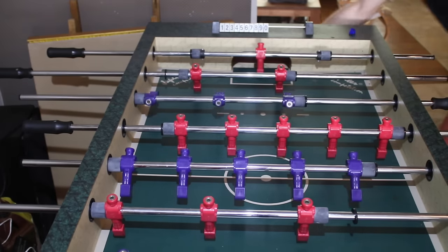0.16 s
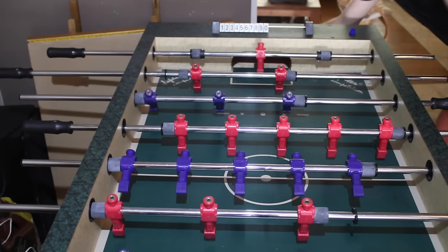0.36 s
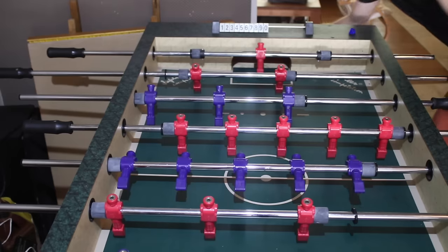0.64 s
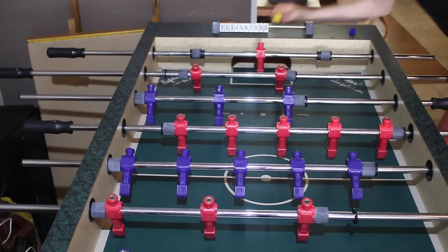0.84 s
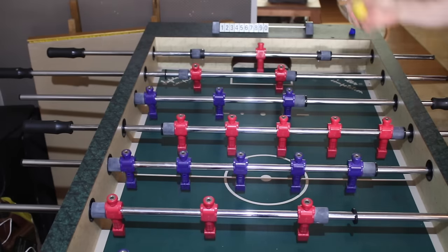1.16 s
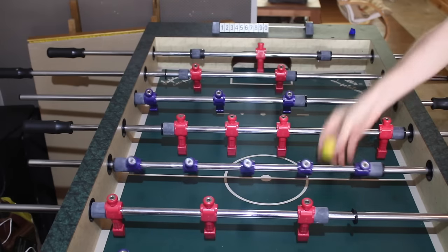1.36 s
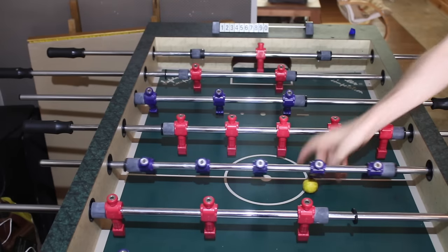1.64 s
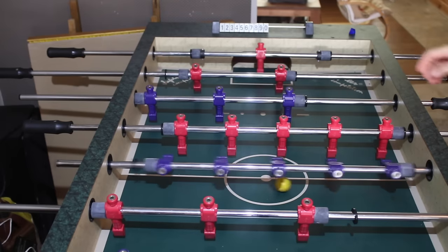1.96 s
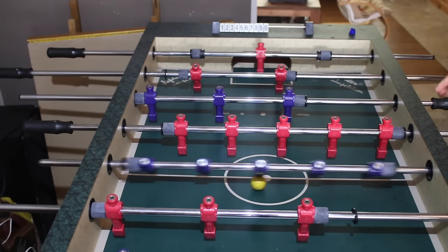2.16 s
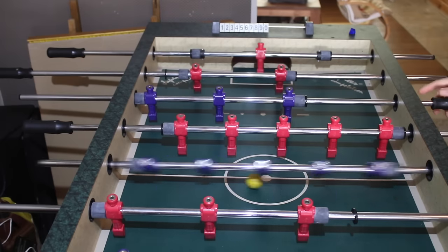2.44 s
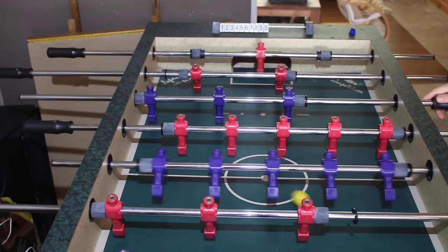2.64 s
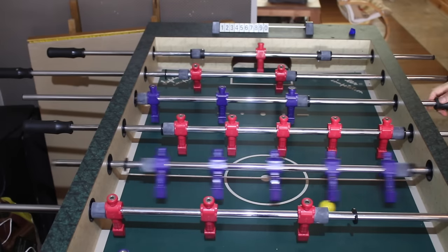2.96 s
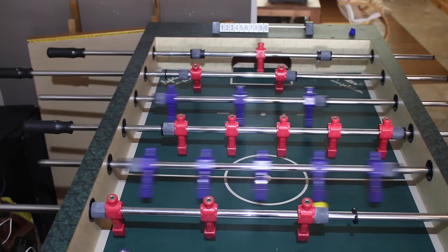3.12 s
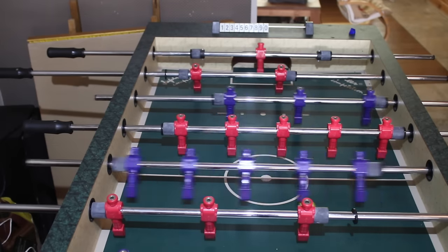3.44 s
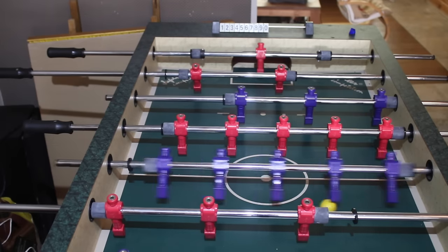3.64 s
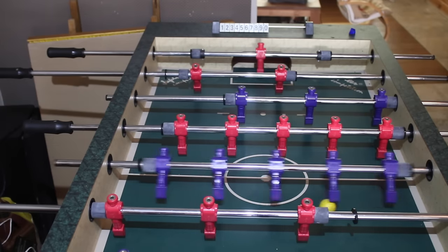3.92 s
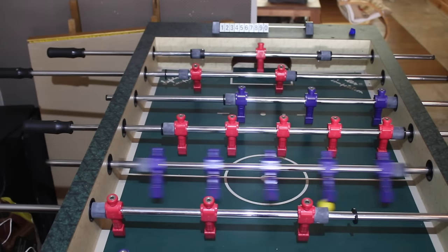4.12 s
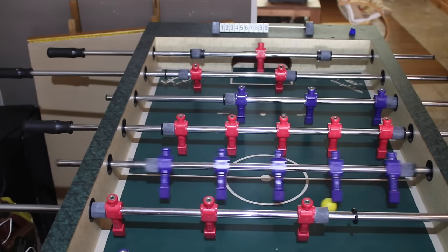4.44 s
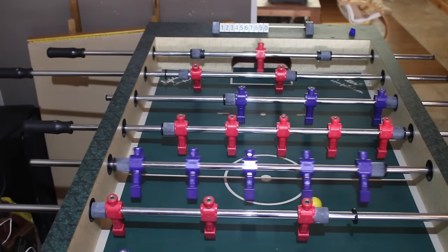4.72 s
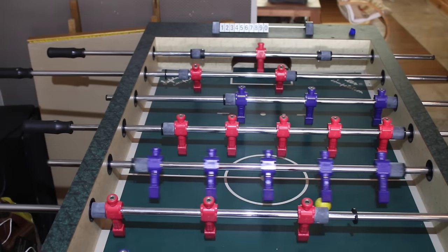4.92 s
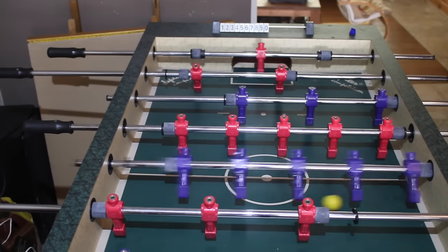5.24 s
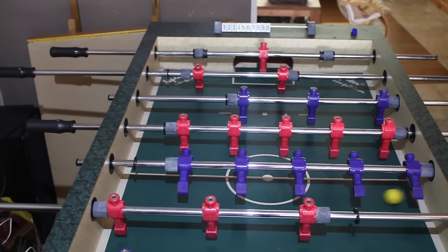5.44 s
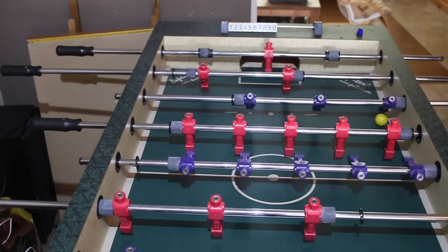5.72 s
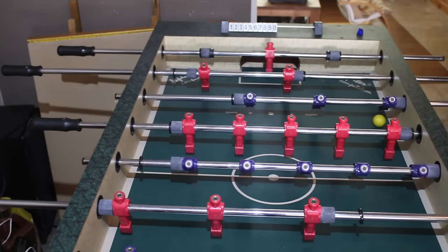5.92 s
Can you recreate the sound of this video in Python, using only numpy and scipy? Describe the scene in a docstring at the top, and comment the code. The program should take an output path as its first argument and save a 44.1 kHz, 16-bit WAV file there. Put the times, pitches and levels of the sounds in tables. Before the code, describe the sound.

Table football up close: hollow booming knocks, a rolling ball, rods clacking and scraping in their bearings, ending with a flurry of hard kicks.

```python
"""A table football ball, close by: it knocks in the return tray, drops on the field and rolls; figures kick it.
Each blow rings the modes of the hollow table, and rolling drives the same modes so the table booms underneath.
Steel rods scrape through their bearings and clack as filtered noise; there is a brief squeak and a thin ring.
The place is a small hard room, with a stereo microphone at one end of the table: noise echoes, still air."""
import sys
import numpy as np
from scipy import signal
from scipy.fft import rfft, irfft
from scipy.io import wavfile
from scipy.ndimage import uniform_filter1d

SR = 44100
rng = np.random.default_rng(int(sys.argv[2]) if len(sys.argv) > 2 else 0)


def unload_audio(sound):
    """Save the sound as a 16-bit wav file, at the path given as the first command line argument."""
    columns = np.transpose(np.atleast_2d(sound))
    # keep every value between -1 and 1, then stretch to whole-number steps
    steps = np.round(np.clip(columns, -1, 1) * 32767)
    wavfile.write(sys.argv[1], SR, steps.astype(np.int16))


N = 268128
T = np.arange(N) / SR  # seconds
FALL = np.log(1000)  # a decay of 60 dB, for t60 times

# Knocks of ball and figures against field and walls; the soft ones from 2.607 to 2.796 s are swells
# of the rolling. Each row: start in seconds, dry peak in dB, hardness in dB per octave,
# ring factor on every t60 (at least 0.1), boom below 200 Hz in dB.
KNOCKS = [(1.554, -26.5, 0, 2.1, 0), (1.611, -14, 2.5, 2.6, -20), (1.627, -13, 0, 1.8, -20),
          (1.649, -3.5, 3, 0.55, 6), (1.66, -6, -2, 1.15, 0), (1.731, -13.5, -9, 1.2, 4),
          (1.857, -25.5, -3, 1.1, -4), (2.016, -19.5, -9, 0.55, -2), (2.151, -21.5, -5, 0.94, 0),
          (2.251, 0, 3, 0.43, 6.5), (2.262, -7.5, 4.5, 0.4, 9), (2.274, -7.5, -16.5, 1.96, -10),
          (2.411, -1.5, -0.5, 0.47, 6.5), (2.421, -7, 4, 0.56, 0), (2.433, -19, -30, 1.1, -14),
          (2.498, -13.5, -22, 0.57, -11), (2.552, -16, -18, 0.73, -13), (2.607, -12, 1.5, 1.2, -8),
          (2.702, -26, -11, 0.44, -36), (2.796, -12, -1, 0.34, -23), (2.8615, 0, 6.5, 0.61, 12.5),
          (2.937, -32, -16, 0.39, -14), (3.286, -24.5, 2, 2.5, -10), (3.32, -19, -18, 0.64, 4),
          (3.64, -37, -6, 0.42, 16), (3.757, -21, 5, 0.51, -2), (4.319, -29, -5, 1.9, -8),
          (4.644, -27, -1, 0.71, -5), (3.545, -32, -10, 0.65, 20), (3.737, -9, -2.5, 1.6, 1),
          (5.2515, -3, 3.5, 0.43, 12.5), (5.261, -4.5, -3, 0.29, 7), (5.308, -8.5, -20, 0.91, -23),
          (5.412, -14, -10, 0.97, 10), (5.488, -9, 0, 0.082, 11), (5.6145, 0, 3, 0.27, -31),
          (5.7155, -8, 11.5, 1.6, -22), (5.85, -13.5, 9, 0.51, -25), (5.897, -13.5, -8, 0.13, -10)]
# Ball in the return tray. Each row: the same columns as KNOCKS.
TRAY_KNOCKS = [(0.1635, -18.5, -0.5, 1.07, -9), (0.265, -25.5, 9, 0.58, -7), (0.344, -22.5, 0.5, 1.16, -10),
               (0.651, -5.5, 4, 0.44, -12), (0.661, -6, 4.5, 0.5, -13)]
# Modes of the hollow table. Each row: frequency in Hz, relative level in dB, t60 in seconds.
TABLE_MODES = [(70.9, -20.5, 0.72), (83, -2.5, 0.042), (133.1, -0.5, 0.081), (192.2, -5, 0.2),
               (223.8, -1, 0.18), (251.2, 0.5, 0.17), (287.6, -6.5, 0.24), (315.4, -2.5, 0.3),
               (358.4, 0, 0.26), (389.1, -5, 0.24), (438, 5, 0.037), (507.6, 0, 0.033), (553, -9.5, 0.11),
               (737, 0.5, 0.0083), (777, -19.5, 0.084), (929, -25, 0.19), (950, -15, 0.18),
               (1006, -7.5, 0.044), (1160, -6, 0.031), (1298.5, -15.5, 0.13), (1439, -17.5, 0.11),
               (1590, -21.5, 0.048), (2325, -18.5, 0.038), (2670, -32, 0.064), (3430, -26, 0.016),
               (3800, -42.5, 0.028)]
# Modes of the return tray. Each row: frequency in Hz, relative level in dB, t60 in seconds.
TRAY_MODES = [(196.7, -9, 0.96), (346, 2.5, 0.18), (410, -5.5, 0.019), (466.7, 0, 0.63), (638, -5, 0.16),
              (750, -6.5, 0.18), (782, -7, 0.16), (1190, -15, 0.057), (1502, -14.5, 0.091)]
# Moments the tray is touched, in seconds; its ring then dies quickly.
TOUCH_S = [.262, .505]
TOUCH_T60_S = .05
SCATTER_DB = 2.2  # every blow finds the modes a little differently
PHASE_SPREAD = .22  # in units of pi radians: the modes of a blow start nearly together

# Ball ticking against a figure. Each row: contact in seconds, dry peak in dB.
TICKS = [(2.571, -19), (3.255, -35), (3.332, -32), (3.353, -21), (3.361, -22), (3.379, -30), (5.445, -29),
         (5.524, -17)]
# Modes of a plastic figure. Each row: frequency in Hz, relative level in dB, t60 in seconds.
FIGURE_MODES = [(2210, -5.5, 0.13), (2380, -8, .045), (2760, -2, 0.05)]

# Ball rolling and rods shaking the table. Each row: time in seconds, level in dB,
# low boom relative to it in dB, dry whirr of the field board relative to it in dB,
# tilt of the body modes in dB per octave.
ROLL = [(0, -35.5, -13, -7, 1), (.13, -52.5, 1, -17, -10), (.9, -57.5, -7, -11, -3), (1.3, -64.5, -5, 4, 4),
        (1.42, -38, -29, -22.5, -9), (1.58, -43, -28, -4.5, 18), (1.76, -24.5, -4, -11.5, -16),
        (1.82, -31.5, -9, -17, -6), (1.98, -29.5, -9, -11, 4), (2.08, -27, -24, -18, 2.5),
        (2.23, -33, -16, -15.5, 1), (2.33, -22, -12, -16, -7), (2.5, -19, -9.5, -23, -18),
        (2.6, -30.5, 4.5, -6, -4), (2.66, -26, -9, -9.5, 4), (2.74, -23, -7, -13.5, 11),
        (2.84, -24.5, -17, -14, 2.5), (2.97, -19, 3, -12.5, -10.5), (3.06, -27.5, -13, -18, -26),
        (3.18, -39, 2.5, -7.5, 8.5), (3.32, -29, -7, -8, 0), (3.45, -38, 3.5, -3.5, 9),
        (3.7, -32.5, 0, -7, 8), (3.8, -28, -3, -13.5, -13), (3.92, -34.5, -7, -7, -2),
        (4.3, -35.5, -1, -7.5, 4.5), (4.64, -35, -1.5, -8, -0.5), (4.87, -44.5, -8, -5.5, 5),
        (5.08, -42.5, -7, -4.5, 3), (5.22, -29, -16, -13, 3), (5.33, -24, -10, -14, -18),
        (5.45, -24, -6, -3, 11), (5.59, -15.5, -15.5, -22.5, -8), (5.622, -57, -54, -22, -6),
        (5.635, -13.5, -45, -34, 12), (5.66, -15, -34, -29, 1), (5.675, -20, -35, -26, -3),
        (5.76, -28, -25, 0, 11), (5.87, -22, -14.5, -8.5, -1), (5.93, -35, -4, -13, -4.5),
        (6.08, -44.5, -4, -3.5, 4)]
FOCUS_DB = 6  # per octave squared: the rolling ball favours the body modes near its spot

# Rods jolting in their bearings. Each row: contact in seconds, dry peak in dB,
# brightness in dB per octave, t60 at 4 kHz in seconds.
CLACKS = [(1.087, -41, 6, 0.27), (1.098, -36, 2.5, 0.3), (1.554, -29.5, -2.5, 0.22),
          (1.658, -26.5, 8, 0.15), (1.831, -26.5, 33, 0.3), (1.84, -24, 2, 0.24), (1.936, -12.5, 5, 0.17),
          (2.2556, -20, 4.5, 0.1), (2.326, -21.5, -0.5, 0.16), (2.413, -19, -0.5, 0.14),
          (2.569, -17, -0.5, 0.25), (2.749, -35.5, 42, 0.12), (2.865, -26, 35, 0.23),
          (3.058, -28, -3, 0.21), (3.279, -14.5, 3, 0.35), (3.284, -12.5, 4.5, 0.096),
          (2.963, -24, -12, 0.21), (3.447, -23, -1.5, 0.2), (3.5694, -12.5, 3, 0.2),
          (3.7628, -20.5, 1.5, 0.22), (3.863, -9, 4, 0.17), (4.052, -30.5, 2.5, 0.47),
          (4.1554, -11.5, 2.5, 0.2), (4.347, -34.5, 16, 0.98), (4.441, -14.5, 3.5, 0.26),
          (4.7433, -10.5, 4, 0.16), (5.0657, -39.5, -3.5, 0.34), (5.126, -42.5, 15, 1),
          (5.171, -28.5, -3, 0.18), (5.215, -21, 0.5, .1), (5.225, -15, 5.5, 0.085), (5.3535, -3, 7.5, 0.1),
          (5.3876, -26, 14, 0.37), (5.4231, -16.5, -1, 0.42), (5.524, -18, -5.5, 0.15),
          (5.6159, -6, -4.5, 0.11), (5.717, -3, -8, 0.033), (5.888, -22.5, -1, 0.42),
          (5.94, -30.5, 5.5, 0.098)]
# Resonances of rod, bearing and figures. Each row: frequency in Hz, width in Hz, level in dB.
ROD = [(806, 98, 9), (1310, 202, 13), (2314, 810, 11), (2843, 170, 6), (3100, 1840, 2.5), (3970, 130, 4.5),
       (4800, 650, 3), (6000, 5400, -7.5), (6960, 2000, 0.5), (9130, 3400, -4), (10900, 9600, -13.5)]
# Rods pushed through their bearings. Each row: middle in seconds, length in seconds,
# scrape level in dB, hiss relative to the scrape in dB.
STROKES = [(1.524, 0.26, -60, 6.5), (1.96, 0.29, -44.5, -3), (2.445, 0.45, -39, -10),
           (3.164, 0.79, -49.5, -6.5), (3.447, 0.27, -48.5, -20), (3.71, 0.74, -56, 7),
           (3.928, 0.17, -42.5, -9), (4.32, 0.44, -48.5, -7), (4.647, 0.2, -48.5, -4),
           (5.467, 0.34, -32, -12.5), (5.823, 0.35, -30.5, -18)]
REST_DB = -78  # faint rubbing that never stops
# Thin high hiss as the rod runs up to its stop: middles in seconds.
SWISH_S = [3.235, 3.52, 3.82, 4.105, 4.39, 4.695]
SWISH_HZ, SWISH_DB, SWISH_LEN_S = 13700, -53, .13

# Rough, staggered partials of a brief squeak. Each row: frequency in Hz, tone peak in dB,
# middle in seconds, length in seconds.
SQUEAK = [(2560, -54, 0.54, 0.05), (1535, -51.5, 0.55, .07), (1280, -46, .55, 0.05),
          (990, -42, .585, 0.091), (3080, -53, 0.586, 0.12), (1950, -64, 0.43, 0.063)]
SQUEAK_HISS_START_S, SQUEAK_HISS_LEN_S = 0.523, 0.11
# Thin high ring that starts at once and fades. Each row: start in seconds, tone level in dB, t60 in seconds.
RING = [(5.453, -50, 0.77), (5.89, -50, 0.34)]
RING_HZ = 13410

# Room echoes. Each row: frequency in Hz, t60 in seconds, echo level in dB.
ROOM = [(165, 0.54, -7.5), (460, 0.28, -4.5), (1460, 0.42, -6.5), (4350, 0.45, -10), (8900, 0.33, -9)]
# Spectrum of still room and microphone hiss. Each row: frequency in Hz, relative density in dB.
AIR = [(18, -30), (30, 3.5), (133, -12.5), (256, 4), (622, -10.5), (996, -18), (2020, -16), (6210, -23.5),
       (6720, -25.5), (15500, -30.5)]
AIR_DB = -51  # overall level
TOP_HZ = 15750  # top of what the microphone passes


def knocks(events, modes, contact_s, rustle_db, rustle_t60, scatter_db, touches=()):
    """A blow rings the panel modes afresh, building up over the contact time, with a rustle of small modes."""
    out, t = np.zeros(N), T[:SR // 3]
    hz, db, t60 = np.transpose(modes)[:, :, None]
    for s, peak_db, hard, ring, boom_db in events:
        ring = max(ring, .1)
        level_luck, pitch_luck, phase_luck = rng.standard_normal((3, len(modes), 1))
        hardness_db = hard * np.log2(np.maximum(hz, 220) / 300)
        gain = undb(db + hardness_db + boom_db * (hz < 200) + scatter_db * level_luck)
        phase = 2 * np.pi * hz * (1 + 0.0052 * pitch_luck) * t + PHASE_SPREAD * np.pi * phase_luck
        ringing = gain * np.exp(-FALL * t / (t60 * ring)) * np.sin(phase)
        body = ringing.sum(axis=0) * (1 - np.exp(-(t / contact_s) ** 2))
        body += rustle(t, hz[:, 0], db[:, 0], hard, rustle_db, rustle_t60 * ring)
        for touch_s in touches:
            if touch_s > s:
                body = body * np.exp(-FALL * np.maximum(s + t - touch_s, 0) / TOUCH_T60_S)
        add(out, s - .001, undb(peak_db) * body / np.abs(body).max())
    return out


def rustle(t, mode_hz, mode_db, hard, rustle_db, t60):
    """The many small modes between and above the main ones: noise bands that fade, treble slightly first."""
    out = np.zeros(len(t))
    for f in 400 * 2 ** np.arange(0, 4.1, .5):
        octaves_above = max(np.log2(f / mode_hz[-1]), 0)
        panel_db = np.interp(np.log(f), np.log(mode_hz), mode_db)
        weight_db = rustle_db + panel_db + hard * np.log2(f / 300) - 13.6 * octaves_above
        noise = rng.standard_normal(len(t))
        noise = level(band(band(noise, f, f / 2.6), f, f / 2.6))
        out += undb(weight_db) * noise * np.exp(-FALL * t * (f / 1000) ** 0.023 / t60)
    return out


def ticks():
    """Each light tick of ball on figure rings the few modes of the plastic."""
    out, t = np.zeros(N), T[:SR // 8]
    hz, db, t60 = np.transpose(FIGURE_MODES)[:, :, None]
    for s, peak_db in TICKS:
        level_luck, pitch_luck = rng.standard_normal((2, len(FIGURE_MODES), 1))
        fade = undb(db + 3 * level_luck) * np.exp(-FALL * t / t60)
        sound = (fade * np.sin(2 * np.pi * hz * (1 + .015 * pitch_luck) * t)).sum(axis=0)
        add(out, s - .001, undb(peak_db) * sound / np.abs(sound).max())
    return out


def rumble():
    """Soft bumps of the rolling ball drive the table modes; its spot decides which body modes lead."""
    bumps = grit(500, 2.5)
    roll_db, boom_db, whirr_db, tilt = curve(ROLL)
    body, boom, whirr = 0, 0, 0
    for hz, db, t60 in TABLE_MODES:
        # a soft contact has no sharp edge
        drive = band(bumps + 0.74 * rng.standard_normal(N), hz, hz / 6)
        mode = undb(db) * np.sqrt(t60) * level(band(drive, hz, 1.3 * FALL / np.pi / t60))
        octaves = np.log2(hz / 280)
        if hz < 150:
            boom = boom + mode
        elif hz < 650:
            body = body + mode * undb(tilt * octaves - FOCUS_DB * octaves ** 2)
        else:
            whirr = whirr + mode
    return undb(roll_db) * (level(body) + undb(boom_db) * level(boom) + undb(whirr_db) * level(whirr))


def clacks():
    """A jolt sets off a quick chatter of rod against bearing that dies away, treble first."""
    out, t = np.zeros((2, N)), T[:SR // 3]
    for s, peak_db, bright, t60 in CLACKS:
        sound = 0
        for hz, resonance in rod_bands(unsteady(len(t), hold=60, spread_db=0.5)):
            gain = undb(bright * np.log2(hz / 4000) + SCATTER_DB * rng.standard_normal())
            fade = np.exp(-FALL * t * (hz / 4000) ** 0.39 / max(t60, .02))
            sound = sound + gain * resonance * fade
        sound = sound * (1 - np.exp(-t / .0008))
        sound = sound * (1 + 0.37 * np.exp(-t / 0.0034))  # the first contact is the hardest
        add(out, s - .002, undb(peak_db) * sound / np.abs(sound).max())
    return out


def slide():
    """Stick-slip in the bearings through the rod resonances: low scrape and high hiss, strongest in mid-stroke."""
    scrape, hiss = 0, 0
    for hz, resonance in rod_bands(unsteady(N, hold=90, spread_db=2.0)):
        # each resonance swells on its own
        part = resonance * uniform_filter1d(unsteady(N, hold=700, spread_db=4.0), size=400)
        if hz < 4500:
            scrape = scrape + part
        else:
            hiss = hiss + part
    scrape, hiss = level(scrape), level(hiss)
    out = undb(REST_DB) * (scrape + undb(-7) * hiss)
    for s, length, db, hiss_db in STROKES:
        out = out + undb(db) * swell(s, length) * (scrape + undb(hiss_db) * hiss)
    return out


def rod_bands(chatter):
    """Rod resonances shaken by chattering noise; the higher they lie, the less alike at the two ears."""
    out = []
    for hz, width, db in ROD:
        mid, side = rng.standard_normal((2, len(chatter))) * chatter
        ears = mid + min(hz / 5000, .9) * np.outer([1, -1], side)
        out.append((hz, undb(db) * band(band(ears, hz, 1.41 * width), hz, 1.41 * width)))
    return out


def swish():
    """A thin band of high noise swells and fades as the rod runs up to its stop."""
    noise = level(band(rng.standard_normal((2, N)), SWISH_HZ, SWISH_HZ / 6), SWISH_DB)
    return noise * sum(swell(s, SWISH_LEN_S) for s in SWISH_S)


def squeak():
    """Partials roughened by narrow noise swell and fade over a hiss."""
    hiss = level(band(rng.standard_normal(N), 2800, 3300), -50)
    middle_s = SQUEAK_HISS_START_S + SQUEAK_HISS_LEN_S / 2
    out = hiss * np.sqrt(np.abs(swell(middle_s, SQUEAK_HISS_LEN_S)))
    for hz, db, s, length in SQUEAK:
        roughness = level(band(rng.standard_normal(N), hz, 60), -7)
        out = out + undb(db) * (np.sin(2 * np.pi * hz * T) + roughness) * swell(s, length)
    return out


def high_ring():
    """A high tone, wavering a little with narrow noise, starts at once and decays exponentially."""
    waver = level(band(rng.standard_normal(N), RING_HZ, 150), -8)
    ring = np.sqrt(2) * np.sin(2 * np.pi * RING_HZ * T) + waver
    return ring * sum(undb(db) * (T > s) * np.exp(-FALL * np.abs(T - s) / t60) for s, db, t60 in RING)


def room(x):
    """Echoes thicken within a millisecond or two and die away; the ears differ in the treble, first off the
    near table walls."""
    t = T[:SR // 2]
    f = np.fft.rfftfreq(len(t), 1 / SR)
    mid, side, near = rfft(rng.standard_normal((3, len(t))))
    side = side * np.clip(f / 2600, .06, 1.3)
    near = irfft(near * np.clip(f / 2500, 0, 1.1), len(t)) * np.exp(-t / 0.0039)
    echo = np.outer([1, -1], near) * undb(-28.5)
    centres = np.log([row[0] for row in ROOM])
    for k, (hz, t60, db) in enumerate(ROOM):
        share = np.interp(np.log(f + 1), centres, np.arange(len(ROOM)) == k)
        shape = np.exp(-FALL * t / t60) * (1 - np.exp(-t / 0.00047))
        noise = irfft(share * np.array([mid + side, mid - side]), len(t))
        echo = echo + undb(db) * noise * shape / np.sqrt(np.sum(shape ** 2))
    return x + signal.fftconvolve(x, echo, axes=1)[:, :N]


def air():
    """Still room and microphone hiss as shaped noise; the bass is nearly the same left and right."""
    f = np.maximum(np.fft.rfftfreq(N, 1 / SR), 1)
    hz, db = np.transpose(AIR)
    shape = undb(np.interp(np.log(f), np.log(hz), db))
    mid, side = rfft(rng.standard_normal((2, N)))
    side = side * np.clip(f / 2500, .1, 1)
    return level(irfft(shape * np.array([mid + side, mid - side]), N), AIR_DB)


def undb(db):
    """Amplitude factor of a level in dB."""
    return 10 ** (np.asarray(db) / 20)


def level(x, db=0):
    """Scale a sound to an RMS level in dB."""
    return x * undb(db) / np.sqrt(np.mean(x ** 2))


def curve(table):
    """Columns of a table joined by straight lines in time."""
    s, *columns = np.transpose(table)
    return [np.interp(T, s, c) for c in columns]


def band(x, hz, width):
    """Resonant band-pass, gain 1 at the centre."""
    return signal.lfilter(*signal.iirpeak(min(hz, .45 * SR), hz / width, fs=SR), x)


def add(out, s, sound):
    """Mix a sound in from time s."""
    i = int(s * SR)
    out[..., i:i + sound.shape[-1]] += sound[..., :N - i]


def grit(rate, spread_db):
    """Random tiny contacts, rate a second, a few much stronger than the rest."""
    hit = rng.random(N) < rate / SR
    return level(hit * rng.standard_normal(N) * undb(spread_db * rng.exponential(size=N)))


def unsteady(length, hold, spread_db):
    """Contact force that jumps to a new strength every hold samples."""
    steps_db = spread_db * rng.standard_normal(length // hold + 1)
    return undb(steps_db.repeat(hold)[:length])


def swell(middle_s, length_s):
    """A smooth rise and fall."""
    return np.cos(np.pi * np.clip((T - middle_s) / length_s, -.5, .5))


def scene():
    """Everything at the table sounds in the room; still air lies underneath."""
    tray = knocks(TRAY_KNOCKS, TRAY_MODES, contact_s=0.0016, rustle_db=-10.0, rustle_t60=0.45,
                  scatter_db=1.2, touches=TOUCH_S)
    field = knocks(KNOCKS, TABLE_MODES, contact_s=0.003, rustle_db=-11.0, rustle_t60=0.22,
                   scatter_db=SCATTER_DB)
    ball = tray + field + ticks() + rumble()
    rods = clacks() + slide() + swish()
    played = room(ball + rods + squeak() + high_ring())
    no_deeper = signal.butter(7, 58, "high", fs=SR, output="sos")  # the table radiates no deeper
    return signal.sosfilt(no_deeper, played) + air()


def record(dry):
    """The left microphone port hears a little more bass; peaks beyond full scale clip; the top is cut."""
    bass = signal.sosfilt(signal.butter(1, 110, fs=SR, output="sos"), dry)
    heard = np.clip(dry + np.array([[.12], [-.12]]) * bass, -1, 1)
    return signal.sosfilt(signal.ellip(10, .2, 70, TOP_HZ, fs=SR, output="sos"), heard)


dry = scene()
out = record(dry)
unload_audio(out)
```